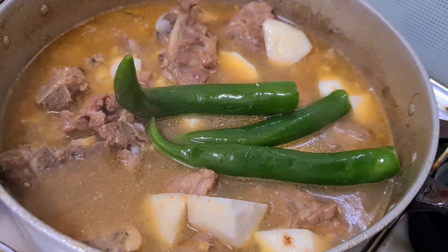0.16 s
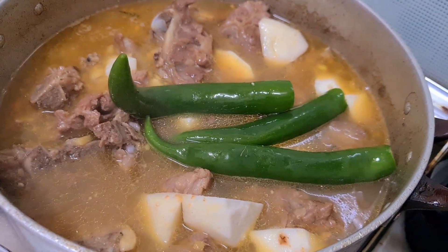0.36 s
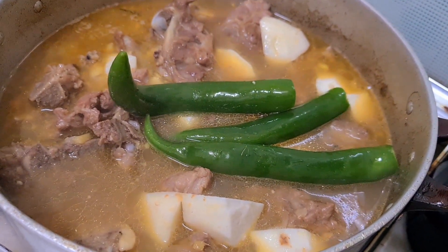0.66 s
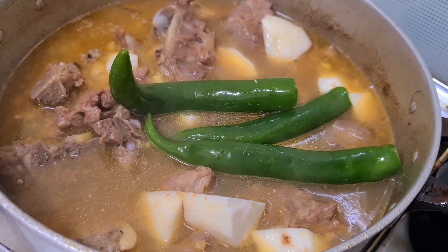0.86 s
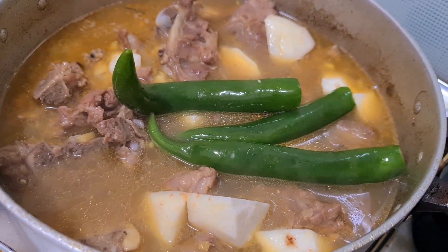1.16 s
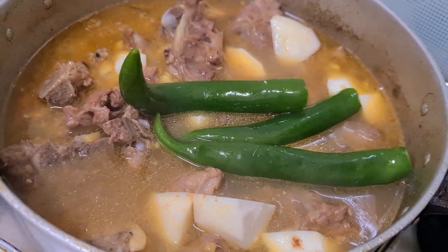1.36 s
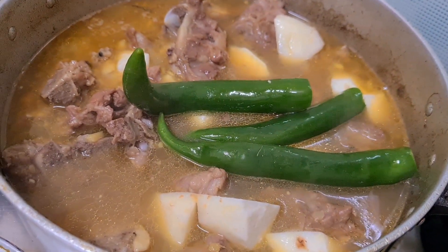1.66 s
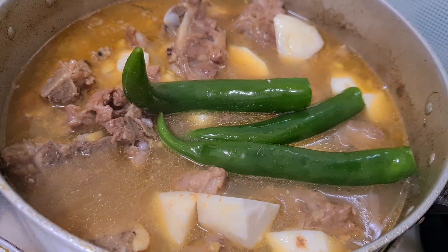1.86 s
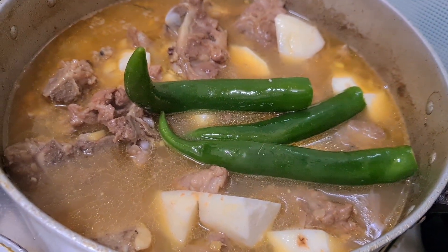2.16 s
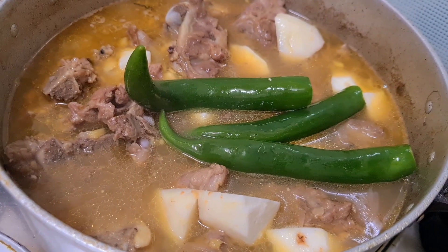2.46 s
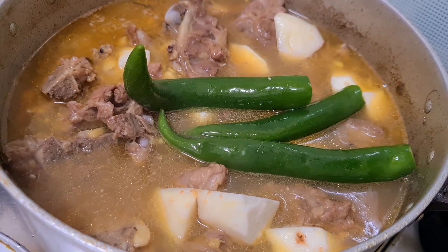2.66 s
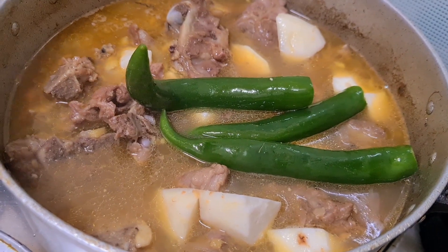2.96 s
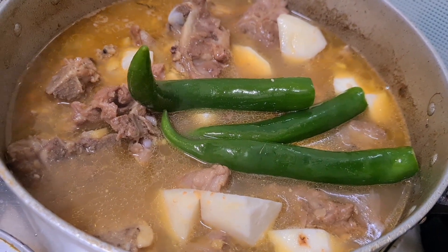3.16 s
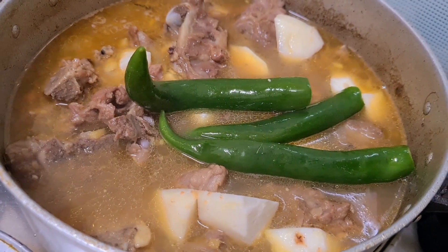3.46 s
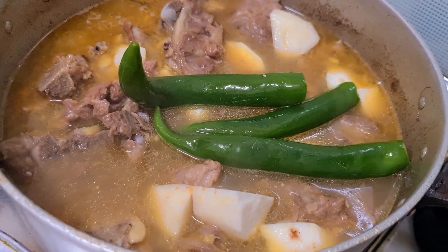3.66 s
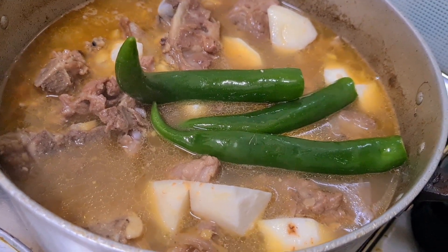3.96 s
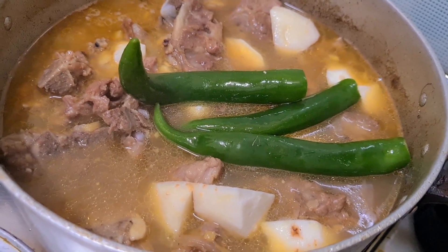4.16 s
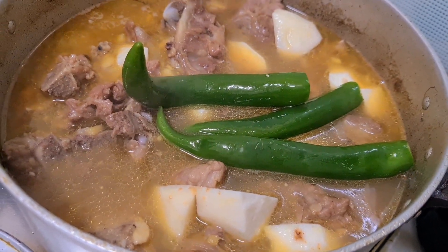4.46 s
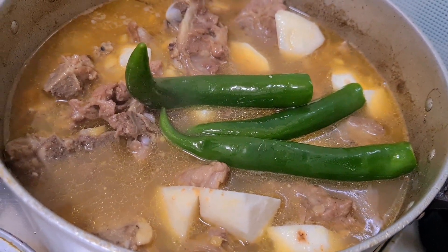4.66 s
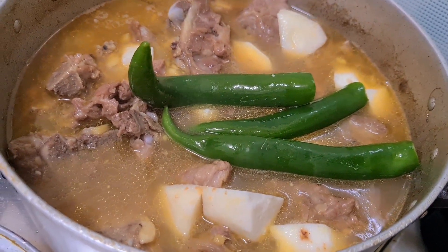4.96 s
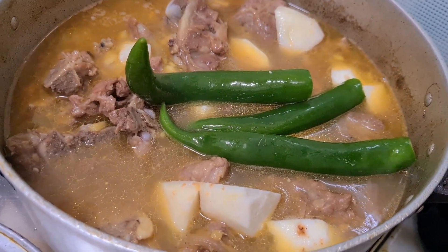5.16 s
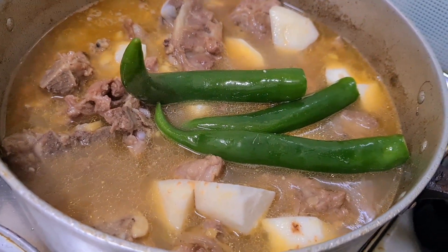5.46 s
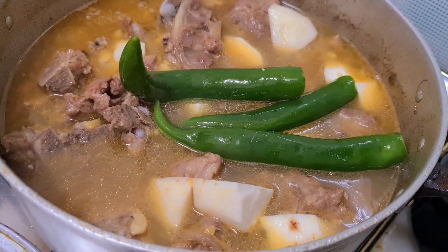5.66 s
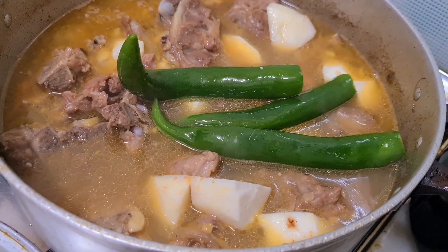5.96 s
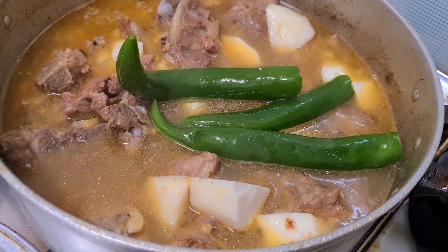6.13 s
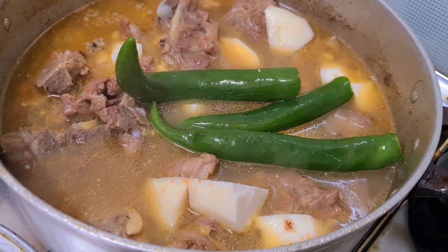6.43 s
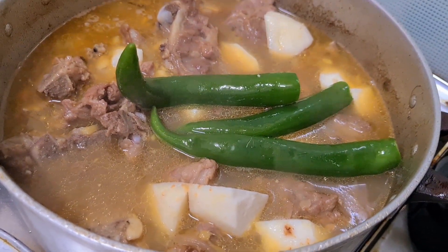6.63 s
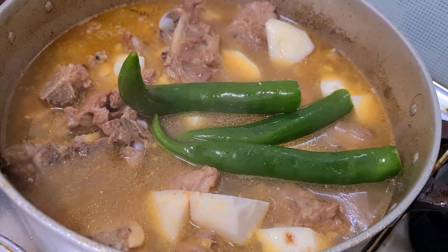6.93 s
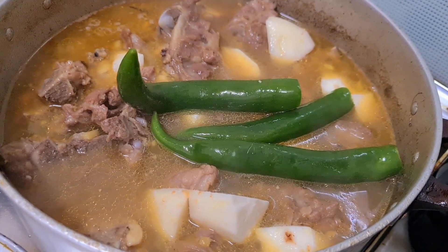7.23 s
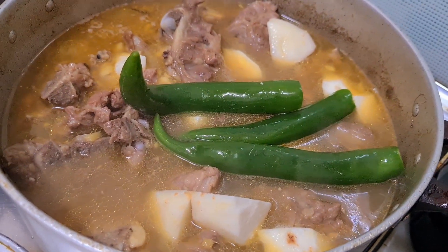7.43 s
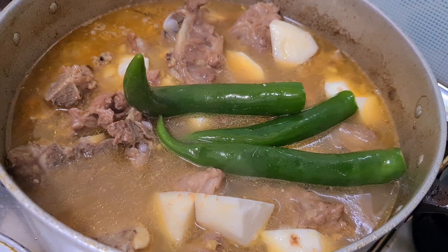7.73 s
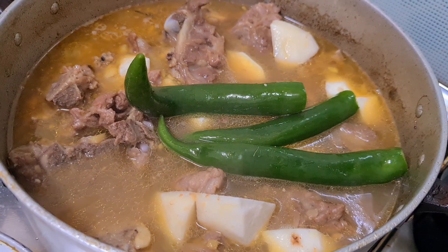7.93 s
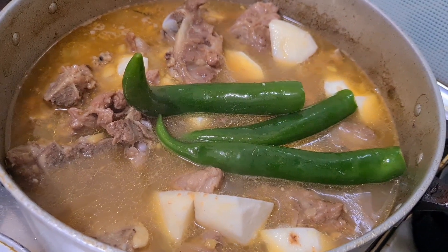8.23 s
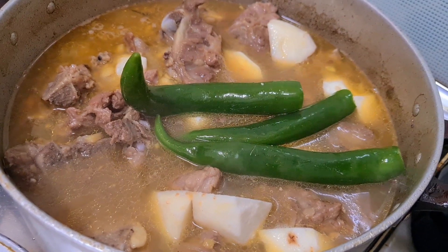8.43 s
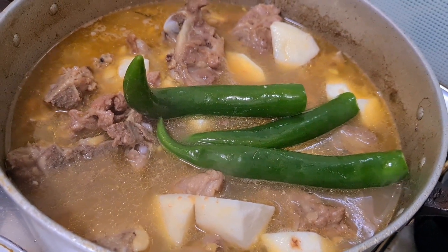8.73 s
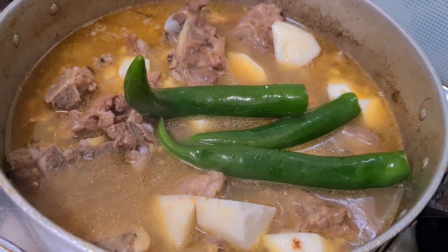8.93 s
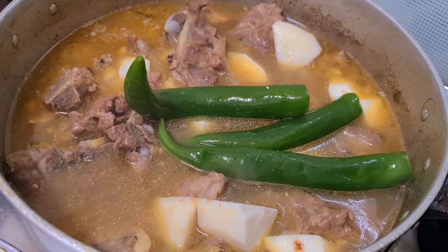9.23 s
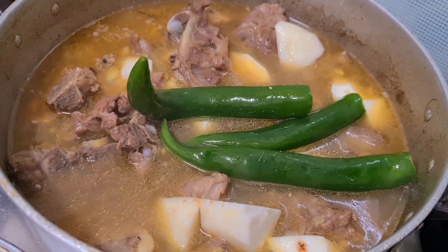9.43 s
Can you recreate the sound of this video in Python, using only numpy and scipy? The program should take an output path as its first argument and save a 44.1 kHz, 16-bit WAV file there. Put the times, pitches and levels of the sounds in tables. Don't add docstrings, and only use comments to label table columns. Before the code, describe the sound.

Close, slightly left, a wide pot of broth simmers throughout: irregular wet pops, crisp fat ticks and dense fine fizz over a steady flame and steam hiss. Behind it, a heavy object drags across floorboards in low booming, rattling lurches for about the first four seconds. Short dull wood knocks come later, with a scrape near six seconds. Small tiled kitchen, soft motor hum, hand-held stereo microphones at arm's length.

```python
import sys
import numpy as np
from scipy import signal
from scipy.fft import rfft, irfft, next_fast_len
from scipy.io import wavfile
from scipy.ndimage import uniform_filter1d, map_coordinates

SR = 44100
rng = np.random.default_rng(int(sys.argv[2]) if len(sys.argv) > 2 else 0)


def natural_amplitude(level_db):
    exponent = np.asarray(level_db, float) / 20
    return 10 ** exponent


def unload_audio(sound):
    columns = np.transpose(np.atleast_2d(sound))
    steps = np.round(np.clip(columns, -1, 1) * 32767)
    wavfile.write(sys.argv[1], SR, steps.astype(np.int16))


N = 422919
TIME = np.arange(N) / SR


def unit(x):
    return x / np.sqrt(np.mean(x ** 2) + 1e-20)


def along(points, hz):
    f, v = np.transpose(points)
    return np.interp(np.log(hz + 1), np.log(f + 1), v)


def level_curve(rows):
    s, db = np.transpose(rows)
    return np.interp(TIME, s, db, -120, -120)


def wobble(rate):
    knots = rng.standard_normal(int(N * rate / SR) + 4)
    return map_coordinates(knots, [TIME * rate])


def swells(s, db, rise, fall, hold=0):
    late = TIME - np.reshape(s, (-1, 1))
    climb = np.minimum(rise * late, 0)
    sink = fall * np.maximum(late - hold, 0)
    return np.max(np.reshape(db, (-1, 1)) + climb - sink, axis=0)


def filtered(x, response):
    length = x.shape[-1]
    m = next_fast_len(length + SR // 4)
    spectrum = rfft(x, m) * response(np.fft.rfftfreq(m, 1 / SR))
    return irfft(spectrum, m)[..., :length]


def modes(table):
    def response(f):
        total = 0
        for k, (center, width, db) in enumerate(table):
            total = total + (-1) ** k * natural_amplitude(db) * 1j * f * width / (center ** 2 - f ** 2 + 1j * f * width)
        return total
    return response


# (frequency [Hz], likeness [0-1])
PORT_LIKENESS = [(60, 0.97), (250, 0.92), (600, 0.4), (1500, 0.64), (5000, 0.15), (12000, 0.069)]


def rush(response, patchy_db):
    z = signal.stft(rng.standard_normal((2, N)), nperseg=512)[2]
    field = uniform_filter1d(rng.standard_normal(z.shape[1:]), size=8, axis=0)
    field = unit(uniform_filter1d(field, size=5, axis=1))
    pair = signal.istft(z * natural_amplitude(patchy_db * field), nperseg=512)[1][:, :N]

    def mid_side(hz):
        turn = np.arccos(np.clip(along(PORT_LIKENESS, hz), 0, 1)) / 2
        return response(hz) * np.array([np.cos(turn), np.sin(turn)])

    mid, side = filtered(pair, mid_side)
    return unit(np.array([mid + side, mid - side]))


def bubbles(s, db, hz, cycles, pan_db, rise, spread, size):
    life = (np.clip(cycles, 1, 40) / hz)[:, None]
    shift = spread * rng.uniform(-1.3, 1, len(s))
    out = np.zeros((2, N))
    for port, sign in enumerate((1, -1)):
        start = np.clip((s + sign * shift) * SR, 0, N)
        t = (np.arange(size) + 1 - start[:, None] % 1) / SR
        swell = np.exp(-3.5 * t / life) * (1 - np.exp(-2.5 * t / life)) * 5.1
        climb = 1 + rise * np.minimum(t / life, 2)
        tone = np.sin(2 * np.pi * hz[:, None] * t * climb)
        rows = natural_amplitude(db + sign * pan_db / 2)[:, None] * swell * tone
        place = start.astype(int)[:, None] + np.arange(size)
        out[port] = np.bincount(place.ravel(), rows.ravel(), N + size + 1)[:N]
    return out


# (time [s], peak level [dB], pitch [Hz])
BURSTING_BUBBLES = [(0.1045, -25, 3000), (0.4622, -28, 2650), (0.5687, -30, 2770), (0.837, -39, 1880),
                    (0.9308, -35, 2020), (0.9644, -39, 1900), (1.259, -36.5, 1960), (1.6466, -37, 3050),
                    (1.6618, -24, 2720), (1.707, -29, 2720), (1.9092, -35.5, 1960), (2.143, -37, 3170),
                    (2.1592, -28, 2900), (2.2424, -37, 1900), (2.3005, -31, 2270), (2.355, -29.5, 2050),
                    (2.6606, -27, 3010), (2.8626, -30, 2020), (2.9916, -45, 3200), (2.9916, -36, 2740),
                    (3.0828, -35.5, 1930), (3.3368, -34, 2970), (3.5946, -30, 2540), (3.7414, -23.5, 2770),
                    (3.8417, -38, 1870), (4.0397, -37, 2790), (4.0527, -23, 2870), (4.469, -31, 2860),
                    (4.7117, -30, 2070), (4.7182, -23, 2710), (4.788, -27, 1990), (4.8633, -32, 1860),
                    (4.8882, -25, 2680), (5.3617, -30, 3120), (5.5902, -30, 3150), (5.9537, -31, 1880),
                    (5.9713, -44, 2070), (6.0152, -26, 2140), (6.1396, -33.5, 2040), (6.323, -25, 3220),
                    (6.4372, -25, 2870), (6.568, -39, 2780), (6.5825, -22.5, 2700), (6.7083, -36.5, 1910),
                    (6.9123, -26.5, 2640), (7.0957, -43, 1960), (7.1088, -23.5, 2025), (7.265, -42, 1910),
                    (7.4298, -29, 2780), (7.747, -37, 2780), (8.0013, -26, 3100), (8.3145, -34, 1900),
                    (8.4731, -43, 1930), (8.745, -29, 2970), (8.8048, -28, 2950), (8.9332, -29, 2790),
                    (9.0523, -24, 1950), (9.209, -21.5, 3110), (9.4093, -36, 2740), (9.4805, -28, 2760),
                    (0.1072, -24.5, 3220), (0.5616, -29, 3240), (0.61, -28, 4050), (0.6995, -34, 4070),
                    (0.838, -29, 4090), (0.8704, -27, 3410), (0.9078, -34, 3570), (1.2052, -38, 3700),
                    (1.268, -25.5, 3500), (1.8008, -28, 3550), (1.917, -28.5, 3520), (2.271, -30, 3780),
                    (2.6672, -19, 3350), (2.756, -29, 3970), (2.8549, -20, 3200), (2.9791, -36, 3450),
                    (2.9921, -22.5, 3340), (3.1557, -28, 3890), (3.339, -25, 4340), (3.3528, -25, 3480),
                    (3.5723, -25, 3780), (3.7419, -27, 3300), (3.7419, -25.5, 3250), (3.8735, -26, 4330),
                    (4.224, -33, 3380), (4.2597, -26.5, 3880), (4.611, -27, 4100), (4.7087, -31, 4070),
                    (4.8324, -30, 3780), (5.257, -28, 4000), (5.3632, -24, 3640), (5.44, -24, 3420),
                    (5.5912, -34, 3600), (5.6131, -22.5, 3500), (5.68, -28, 3950), (5.8341, -32, 3820),
                    (5.8527, -29, 3240), (5.9758, -20, 3500), (6.0826, -21, 4060), (6.257, -29, 3430),
                    (6.2786, -29, 4120), (6.2904, -23, 3700), (6.323, -19.5, 3920), (6.4155, -34.5, 3680),
                    (6.4408, -24.5, 3750), (6.711, -28, 3680), (6.8194, -34, 3870), (6.984, -34, 3240),
                    (7.3123, -29, 3920), (7.4347, -27, 3280), (7.5642, -27, 3340), (7.7278, -41, 3600),
                    (7.7472, -24, 3220), (7.882, -30, 3880), (8.315, -26, 3930), (8.5535, -26, 3240),
                    (8.805, -36, 3530), (8.8248, -20, 3680), (9.1622, -30, 3850), (9.4092, -33, 3880),
                    (0.0553, -30, 5890), (0.1042, -29, 5400), (0.1775, -30, 5380), (0.1945, -23, 4760),
                 (0.2578, -27, 5600), (0.5611, -32, 5700), (0.599, -25, 5950), (1.0874, -28, 5320),
                 (1.2047, -29, 4970), (1.274, -33, 5220), (1.3877, -28, 4930), (1.4042, -33, 4960),
                 (1.4596, -29, 5370), (1.5668, -24, 4900), (2.0877, -30, 4860), (2.4598, -19.5, 4800),
                 (2.5287, -26, 5200), (2.7556, -30, 5510), (2.8484, -23, 6200), (2.8614, -17.5, 5300),
                 (2.9891, -19.5, 5420), (3.0869, -30, 5100), (3.3009, -26, 5300), (3.4236, -24, 6960),
                 (4.2647, -24, 4840), (4.3884, -32, 4840), (4.4697, -24.5, 5030), (4.6698, -34, 5390),
                 (4.6833, -23, 5410), (4.8763, -32, 6510), (4.8918, -23.5, 5040), (5.0325, -31, 6260),
                 (5.3353, -28, 5340), (5.3547, -25, 5910), (5.6072, -32, 5130), (5.7633, -29, 5270),
                 (5.8321, -31, 5400), (5.9554, -27, 4550), (5.9599, -23, 5660), (6.0806, -27, 4580),
                 (6.1459, -32, 5400), (6.4747, -23, 5700), (6.4981, -26, 5540), (6.7456, -28, 4800),
                 (6.775, -35, 5050), (6.8798, -25.5, 5700), (6.977, -30, 5430), (7.203, -27, 5100),
                 (7.2524, -24, 4900), (7.6555, -26, 4770), (7.876, -29, 4800), (8.5964, -30, 5650),
                 (8.6098, -25, 5300), (8.6717, -32, 4860), (8.6896, -26, 5330), (8.8922, -27, 6600),
                 (8.9915, -26, 5350), (9.0264, -33, 5470), (9.0813, -32, 4860), (9.3207, -29, 5300),
                    (4.0545, -29, 1830),
    (7.1154, -27.5, 2530),
    (3.8487, -25, 5500),
    (3.4, -28, 3200),
    (2.6, -22, 9700),
    (6.4577, -23, 3480),
    (6.914, -28, 1880),
    (6.656, -31, 2700),
    (3.7425, -34, 1950),
]


def pops(count=50):
    luck = rng.standard_normal((count, 2))
    stray_s = rng.random(count) * N / SR
    stray = np.transpose([stray_s, -41 + 2 * luck[:, 0], 4400 * np.exp(0.3 * luck[:, 1])])
    s, db, hz = np.vstack([BURSTING_BUBBLES, stray]).T
    draw = rng.random((len(s), 4))
    pan_db = 13.0 * (draw[:, 1] - 0.5)

    ring_cycles = 5.5 + 6 * draw[:, 0]
    ring = bubbles(s, db, 0.956 * hz, ring_cycles, pan_db, rise=0.066, spread=0.00002, size=600)

    snap_hz = hz * (0.55 + 0.7 * draw[:, 2])
    snap_cycles = 2.5 + 2 * draw[:, 3]
    snap = bubbles(s, db - 4, snap_hz, snap_cycles, pan_db, rise=0.1, spread=0.00002, size=200)

    wait = rng.exponential(1, (len(s), 5))
    bend, bulk = rng.standard_normal((2, len(s), 5))
    froth_s = s[:, None] + 0.015 * wait
    froth_db = db[:, None] - 15.5 + 0.7 * bulk
    froth_hz = hz[:, None] * np.exp(0.087 * bend)
    froth_rows = froth_s, froth_db, froth_hz, 3.9 + 1.8 * bulk, np.repeat(pan_db[:, None], 5, axis=1)
    froth = bubbles(*map(np.ravel, froth_rows), rise=0.043, spread=0.00002, size=300)
    return natural_amplitude(1.5) * (ring + snap + froth)


# (time [s], peak level [dB], pitch [Hz])
FAT_SPITS = [(0.1935, -29, 9690), (0.2668, -26, 11200), (0.2882, -26, 9800), (0.5985, -26, 8680),
             (0.7447, -30, 10900), (0.8111, -26, 9660), (0.8644, -28, 8730), (0.9632, -27, 8700),
             (1.1233, -32, 9050), (1.1458, -24, 7940), (1.4047, -28, 7540), (1.4356, -21, 7260),
             (1.7644, -27, 8490), (2.0502, -26, 9560), (2.4279, -21, 8500), (2.6224, -31, 9570),
             (2.7556, -31, 7010), (2.8429, -26, 9700), (2.8619, -13.5, 9700), (2.9532, -34, 9470),
             (3.0056, -31, 9170), (3.0824, -27, 10500), (3.242, -31, 11600), (3.3258, -25, 8540),
             (3.4241, -22, 9780), (3.4999, -35, 7350), (3.5478, -33, 9770), (3.7683, -28, 10400),
             (4.1001, -28, 8390), (4.2023, -36, 8390), (4.2492, -28, 8490), (4.3455, -28, 8000),
             (4.4423, -30, 8140), (4.6488, -30, 8650), (4.6563, -32, 8070), (4.7072, -29, 7010),
             (5.0993, -25, 8580), (5.1432, -23.5, 8900), (5.4864, -31, 8070), (5.7199, -31, 8400),
             (6.0038, -32, 7660), (6.0741, -25, 7640), (6.117, -28, 8530), (6.6343, -29, 10600),
             (6.6563, -31, 8450), (6.8114, -33, 8130), (7.005, -33, 10100), (7.1801, -26, 8980),
             (7.2514, -36, 7110), (7.4006, -26, 8120), (7.8042, -31, 8970), (7.9409, -24, 8750),
             (8.3265, -30, 7120), (8.4467, -46, 7710), (8.6218, -31, 8550), (8.7889, -36, 7640),
             (8.8922, -24, 8500), (9.1985, -31, 8580), (9.3816, -35, 9560), (9.3926, -28, 9330)]


def spits():
    s, db, hz = np.transpose(FAT_SPITS)
    after = 0.005 * rng.exponential(1, (len(s), 2))
    s = np.c_[s, s[:, None] + after].ravel()
    db = (db[:, None] - [0, 7, 9]).ravel()
    hz = (hz[:, None] * [1, 0.85, 1.15]).ravel()
    cycles, pan_db = rng.uniform(2.9, 4.7, len(s)), rng.normal(0, 1.2, len(s))
    return natural_amplitude(6.5) * bubbles(s, db, hz, cycles, pan_db, rise=0.0058, spread=0.00001, size=160)


# (time [s], fizz level [dB])
BOIL = [(0, -39.5), (0.4, -44), (0.8, -39.5), (1.4, -41), (2.03, -41.5), (2.35, -42.5), (2.8, -42.5),
        (3.3, -41), (4.25, -43.5), (4.86, -39.5), (5.16, -43), (5.5, -40.5), (5.85, -42.5), (7.1, -41.5),
        (7.56, -40), (8.01, -42.5), (8.86, -39), (9.59, -41)]
# (frequency [Hz], level [dB per Hz])
FIZZ_COLOUR = [(500, -8.5), (1000, -10.5), (1500, -2.5), (2100, -4), (3400, -1), (5200, 0.5), (7000, -6),
               (10000, -8), (16000, -13)]


def fizz(surge, count=14000):
    crowd = np.cumsum(natural_amplitude(1.6 * surge + 2.5 * wobble(40)))
    s = np.interp(rng.random(count), crowd / crowd[-1], TIME)
    draw = rng.random((count, 4))
    hz = 900 * 15 ** draw[:, 0]
    size_db = -4 * np.log(draw[:, 1] + 0.01)
    db = along(FIZZ_COLOUR, hz) + 20 * np.log10(hz) + size_db
    cycles, pan_db = 0.5 + 9 * draw[:, 2], 5 * (draw[:, 3] - 0.5)
    grains = bubbles(s, db, hz, cycles, pan_db, rise=0.053, spread=0.00003, size=160)
    return natural_amplitude(level_curve(BOIL) - 1.4) * unit(grains)


# (frequency [Hz], level [dB per Hz])
FLAME_COLOUR = [(300, -5.5), (1000, -19), (3000, 8.5), (6500, 1.5), (8500, 5), (11000, 1.5), (13000, -6.5),
                (15500, -5.5)]


def hiss(surge):
    flame_db = -44 - 0.3 * TIME
    flutter_db = 0.4 * surge + 0.7 * wobble(5) + 0.9 * wobble(60)
    flame = rush(lambda hz: natural_amplitude(along(FLAME_COLOUR, hz)), patchy_db=2.5)
    steam = rush(lambda hz: natural_amplitude(along(FIZZ_COLOUR, hz)), patchy_db=1.5)
    steam_db = level_curve(BOIL) - 2.5 + 0.52 * surge
    return natural_amplitude(flame_db + 4.5 + flutter_db) * flame + natural_amplitude(steam_db) * steam


# (time [s], boom level [dB], rattle level [dB])
LURCHES = [(0.028, -38.5, -61), (0.249, -50, -42.5), (0.352, -39.5, -55), (0.501, -40, -38.5),
           (0.58, -38, -37), (0.722, -42, -58), (0.82, -56, -37), (1.12, -39, -43.5), (1.31, -43, -46),
           (1.708, -40, -60), (1.783, -47, -58), (1.94, -42, -42), (2.052, -41.5, -64), (2.225, -43, -36.5),
           (2.311, -36, -35), (2.403, -32.5, -30.5), (2.487, -36.5, -37), (2.6, -41, -56),
           (2.791, -40.5, -42.5), (2.96, -43, -60), (3.039, -38.5, -50), (3.273, -42, -51),
           (3.359, -37.5, -35.5), (3.499, -44, -54), (3.589, -46, -45.5), (3.85, -55, -64),
           (8.186, -49, -42.5)]
# (frequency [Hz], width [Hz], level [dB])
FLOOR_BOARDS = [(88.4, 7.4, 6), (149, 45, -12)]
# (frequency [Hz], level [dB per Hz])
RATTLE_COLOUR = [(76, -39), (130, -4), (246, -3), (420, -8.5), (475, -5), (747, -13), (810, -4), (900, -47),
                 (1170, -45), (1980, -120)]


def drag():
    s, boom_db, rattle_db = np.transpose(LURCHES)
    boom_level = swells(s, boom_db, rise=76, fall=50) - 1.5
    boom = natural_amplitude(boom_level) * rush(modes(FLOOR_BOARDS), patchy_db=-0.9)
    thump_lead_s = 0.0203
    blows = np.bincount(((s - thump_lead_s) * SR).astype(int), natural_amplitude(boom_db + 54), N)
    thumps = filtered(uniform_filter1d(blows, size=90), modes(FLOOR_BOARDS))
    rattle_level = swells(s, rattle_db, rise=154, fall=92) - 8.5 + 2.2 * wobble(42)
    rattle = rush(lambda hz: natural_amplitude(along(RATTLE_COLOUR, hz)), patchy_db=-0.5)
    return boom + thumps + natural_amplitude(rattle_level) * rattle


# (time [s], peak
# level [dB], pitch [Hz])
JOLTS = [(0.235, -39, 152), (0.781, -46, 283), (0.834, -42, 286), (2.14, -43, 169), (2.254, -35, 223),
         (2.292, -37, 245), (2.319, -36, 250), (2.433, -36, 268), (2.773, -45, 153), (3.284, -41.5, 240),
         (3.319, -44, 177), (7.839, -45, 260), (8.041, -47, 320), (5.964, -41, 810), (5.971, -44, 740),
         (6.04, -31, 870), (5.995, -32, 820), (6.05, -34, 1100), (5.643, -27.5, 1730), (7.814, -43, 327),
         (3.029, -41, 259), (5.286, -39, 450), (2.376, -31, 385), (6.007, -33, 302), (6.021, -32, 439),
         (6.032, -32, 400), (6.045, -29.5, 357), (6.063, -34, 340)]
# (time [s], hold [s], middle level [dB], high level [dB])
GRIT_SCRAPES = [
    (2.242, 0.24, -51.5, -45.5),
    (3.347, 0.033, -54, -47),
    (5.976, 0.068, -40, -39),
]
# (frequency [Hz], width [Hz], level [dB])
DRAGGED_BODY = [
    [(210, 190, -4.5), (800, 29, 5), (1130, 440, -0.5)],
    [(1800, 2600, 2), (3350, 11000, -7)],
]


def scrapes():
    s, db, hz = np.transpose(JOLTS)
    cycles, pan_db = np.full(len(s), 5.5), np.zeros(len(s))
    out = bubbles(s, db + 0.5, hz, cycles, pan_db, rise=0.02, spread=0, size=2500)
    s, hold, *levels = np.transpose(GRIT_SCRAPES)
    grit = natural_amplitude(2.5 * wobble(150))
    for level_db, body in zip(levels, DRAGGED_BODY):
        scrape_db = swells(s, level_db, rise=660, fall=206, hold=hold[:, None]) + 6.5
        out += grit * natural_amplitude(scrape_db) * rush(modes(body), patchy_db=1.5)
    return out


# (time [s], peak level [dB], decay t60 [s], pitch [Hz], thud level [dB])
WOOD_KNOCKS = [(3.027, -49, 0.081, 227, 3), (3.84, -37, 0.14, 291, -24), (4.054, -41.5, 0.071, 506, -21),
               (2.861, -38, .06, 495, -17), (4.143, -48, .06, 458, -20), (4.785, -40, 0.065, 767, -24),
               (5.373, -57, .06, 482, -24), (6.653, -50, .06, 851, -25), (7.35, -50, .06, 503, -20),
               (9.052, -42.5, 0.066, 563, -14), (9.201, -44, 0.051, 513, -16), (4.686, -36, 0.05, 498, -26),
               (4.891, -18.5, 0.063, 810, -17), (5.284, -41, 0.063, 452, -4.5),
               (5.638, -40.5, 0.26, 820, -32), (5.945, -52, 0.11, 296, -10), (6.549, -50.5, 0.091, 514, -1),
               (7.811, -34, 0.035, 235, -30), (8.799, -47, 0.089, 743, -10)]
# (frequency [Hz], width [Hz], level [dB])
WOOD_MODES = [(245, 82, -1.5), (400, 56, 3.5), (503, 62, 4), (810, 98, 3), (1300, 500, -10.5),
              (2880, 200, 4), (5200, 300, -19)]


def knocks():
    out = np.zeros(N + SR)
    t = np.arange(SR // 4) / SR
    wood = modes(WOOD_MODES)
    for s, db, t60, hz, thud_db in WOOD_KNOCKS:
        blow = 0.13 * rng.standard_normal(len(t)) * natural_amplitude(-60 * t / t60) * (1 - np.exp(-t / 0.0011))
        blow[[0, 165]] = 0.6, 4.5
        force = np.pad(natural_amplitude(db + 21.0) * blow, (0, len(t)))
        favoured = modes([(hz, 0.8 * hz, 0)])
        cabinet = modes([(145, 28, thud_db + 17)])
        knock = filtered(force, lambda f: wood(f) * (0.048 + favoured(f)) + cabinet(f))
        out[round(s * SR):][:len(force)] += knock
    return out[:N] * np.ones((2, 1))


# (frequency [Hz], level [dB per Hz])
ROOM_TONE = [(12, -31), (28, 3.5), (49, -2), (61, -2), (70, -0.5), (105, 3), (166, -21), (235, -7.5),
             (270, -19), (305, -29), (376, -19.5), (506, -1), (613, -14.5), (770, -3), (1300, -15),
             (1690, -41), (2860, -120)]
# (time [s], level [dB])
MOTOR_DRONE = [
    (0.96, -51),
    (2.4, -43.5),
    (5.98, -61),
    (8.28, -45),
    (9.24, -53.5),
]
# (frequency [Hz], level [dB])
MOTOR_HUM = [(48.4, -58)]


def kitchen():
    air = natural_amplitude(-48.5 - 4.0) * rush(lambda hz: natural_amplitude(along(ROOM_TONE, hz)), patchy_db=3.5)
    s, db = np.transpose(MOTOR_DRONE)
    drone_db = np.maximum(swells(s, db, rise=46, fall=67), -61)
    air += natural_amplitude(drone_db - 2.5) * rush(modes([(306.1, 5.9, 0)]), patchy_db=6.5)
    for hz, db in MOTOR_HUM:
        phase = 2 * np.pi * np.cumsum(hz * (1 + 0.011 * wobble(2.98))) / SR
        air += np.sqrt(2) * natural_amplitude(db + 2.1 * wobble(4)) * np.sin(phase)
    return air


# (frequency [Hz], decay t60 [s])
ROOM_DECAY = [(100, 0.21), (1000, 0.28), (4000, 0.22), (12000, 0.16)]


def room(x):
    wet = np.zeros((2, N + SR))
    for a in range(0, N, SR // 2):
        hz, t, z = signal.stft(rng.standard_normal((2, SR // 3)), SR, nperseg=256)
        decay = natural_amplitude(-60 * t / along(ROOM_DECAY, hz)[:, None])
        tail = signal.istft(z * decay, SR, nperseg=256)[1]
        tail *= 1 + 0.5 * np.exp(-np.arange(tail.shape[1]) / SR / 0.022)
        part = signal.fftconvolve(x[None, 0, a:a + SR // 2], tail / np.linalg.norm(tail[0]), axes=1)
        wet[:, a + 40:a + 40 + part.shape[1]] += part
    return wet[:, :N]


# (frequency [Hz], phase lead [rad])
LEFT_LEAD = [(0, 0), (780, 0.8), (1120, 2.8), (1550, 3.6), (1980, 6.1), (3010, 8.9), (4220, 14.8),
             (5250, 18.4), (6800, 24.0), (7840, 29.1), (9470, 31.0), (11000, 36.1), (15400, 53.3),
             (16100, 53.4)]
# (frequency [Hz], left minus right [dB])
PORT_BALANCE = [(60, -0.5), (240, -1.5), (950, -0.5), (3770, -2), (15000, 1)]


def scene():
    surge = wobble(11)
    near = pops() + spits() + fizz(surge)
    far = knocks()
    air = near + far + room(natural_amplitude(0.5) * near + natural_amplitude(3.5) * far)
    air += hiss(surge) + drag() + scrapes() + kitchen()

    def ports(hz):
        gain = np.log(natural_amplitude(along(PORT_BALANCE, hz))) / 2
        half = gain + 0.5j * np.interp(hz, *np.transpose(LEFT_LEAD))
        return np.exp([half, -half])

    return filtered(air, ports)


def top_cut(x):
    return signal.sosfilt(signal.butter(12, 16530, fs=SR, output="sos"), x)


def record(dry):
    limited = filtered(dry, lambda hz: natural_amplitude(-np.maximum(hz - 15300, 0) / 8))
    return top_cut(limited)


dry = scene()
out = record(dry)
unload_audio(out)
```